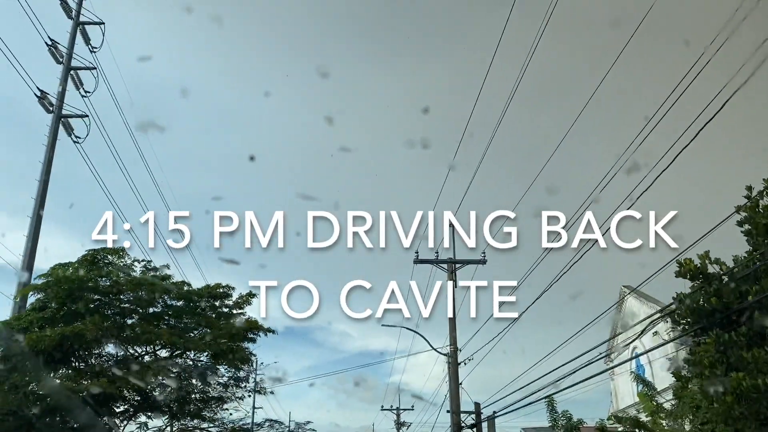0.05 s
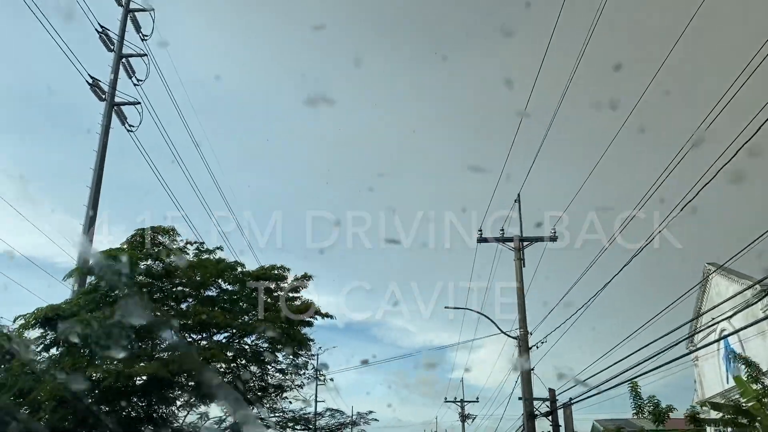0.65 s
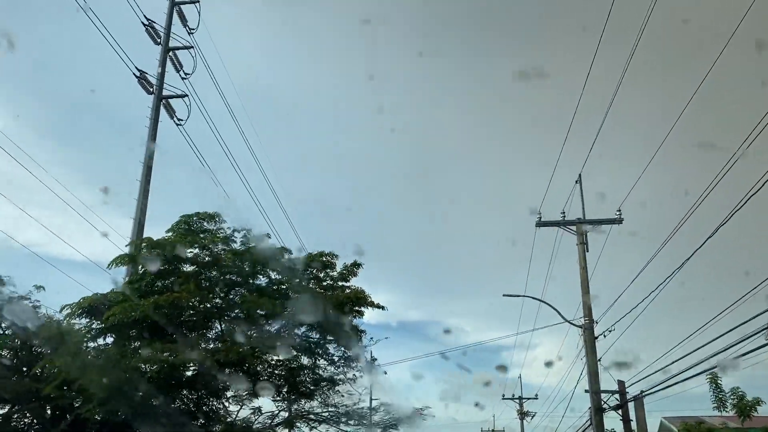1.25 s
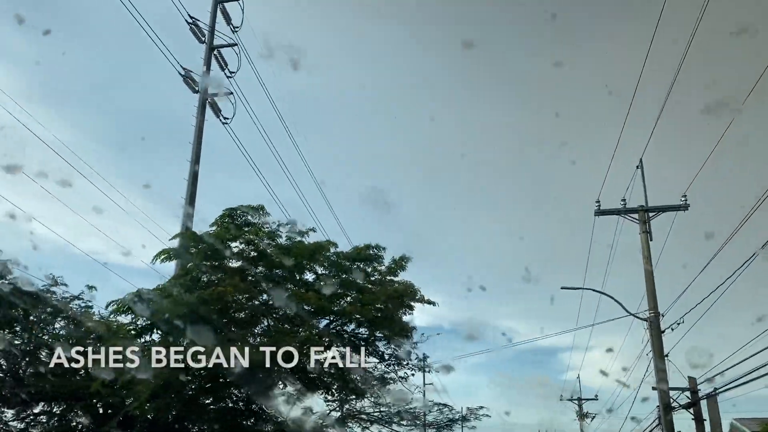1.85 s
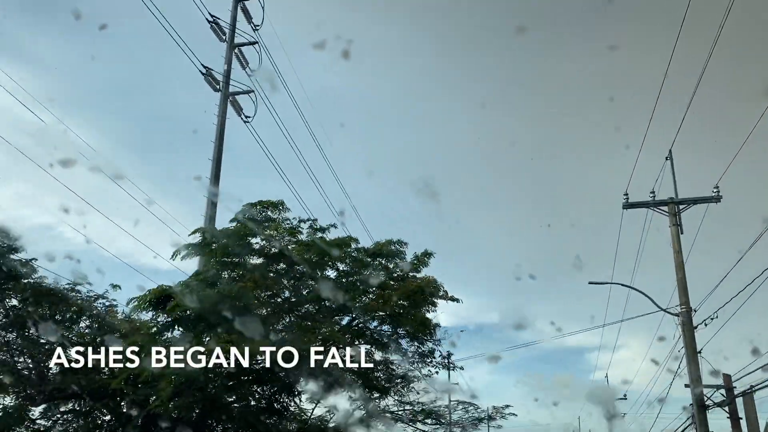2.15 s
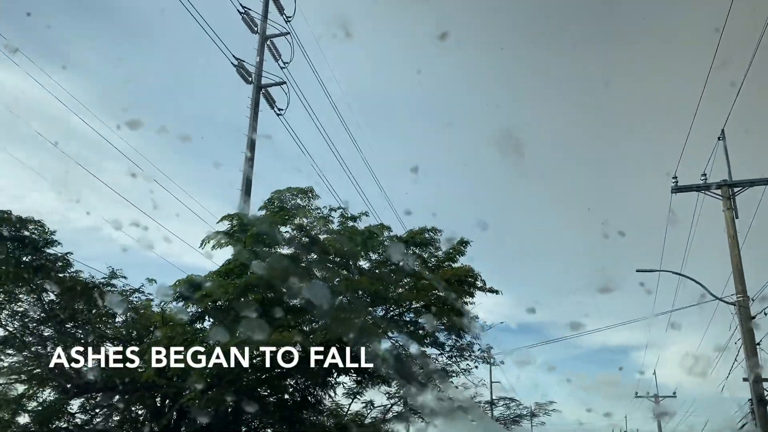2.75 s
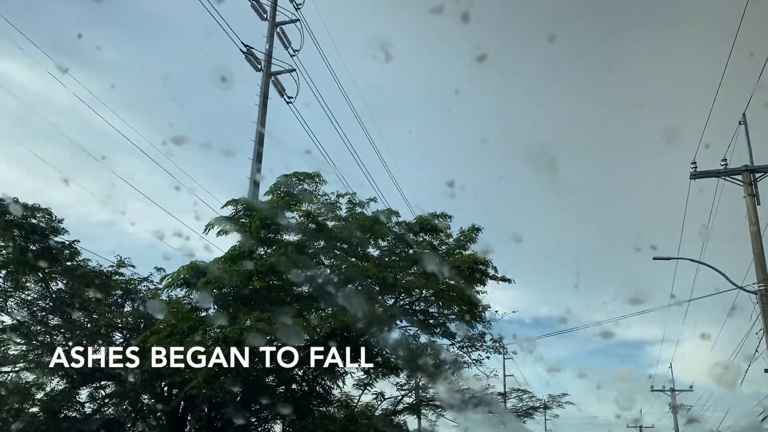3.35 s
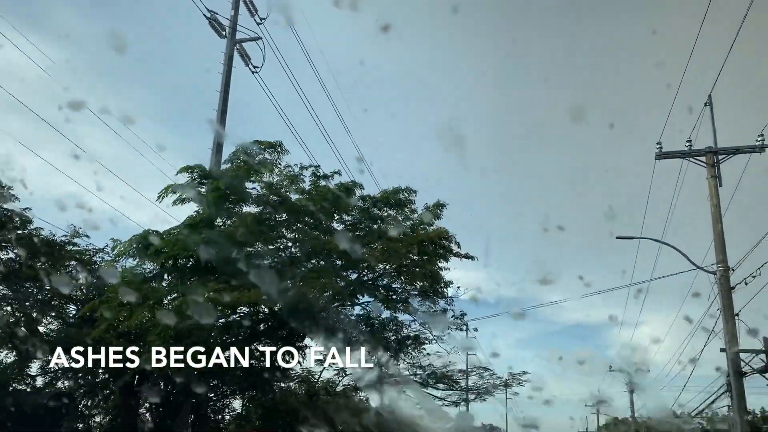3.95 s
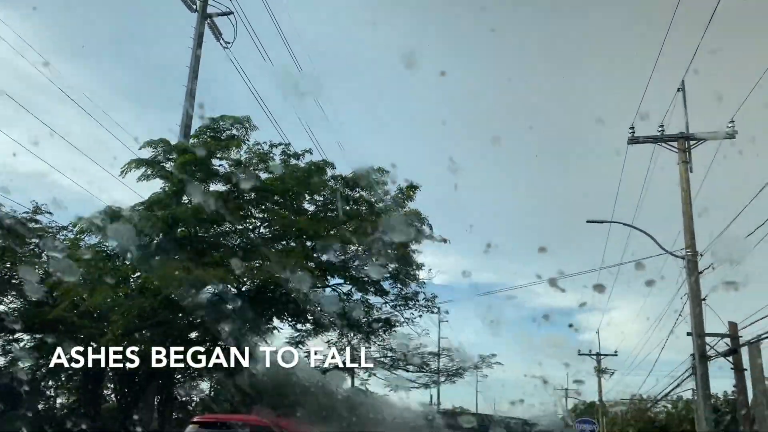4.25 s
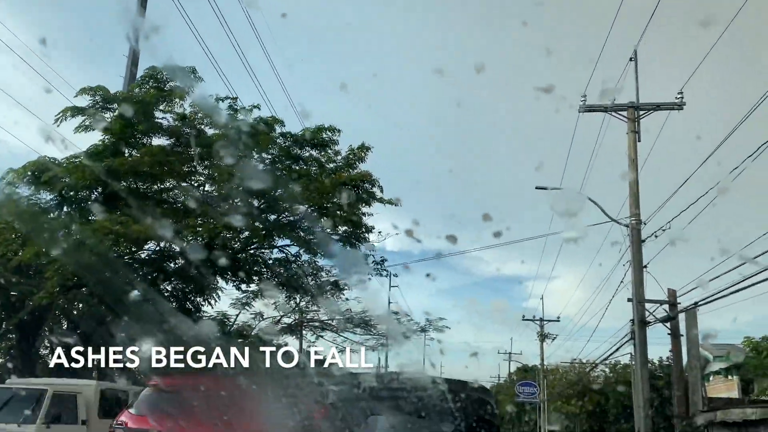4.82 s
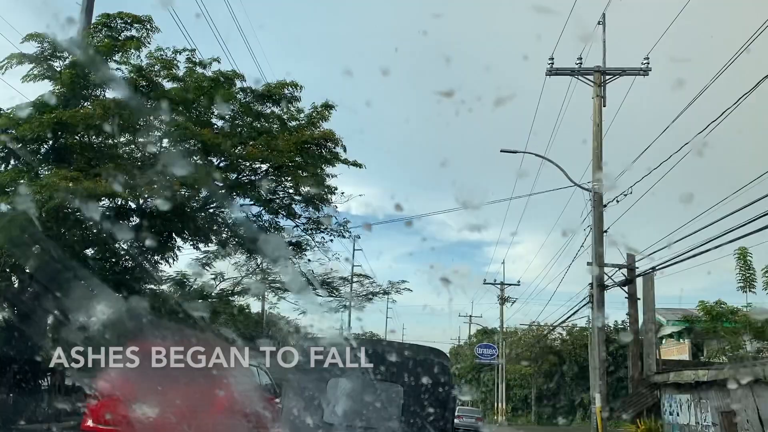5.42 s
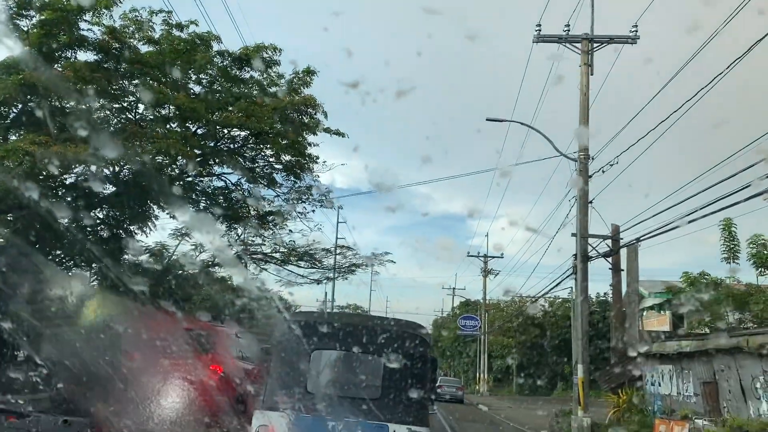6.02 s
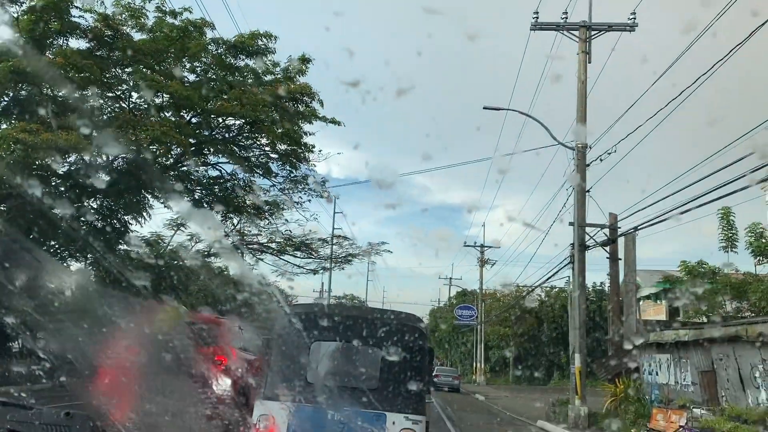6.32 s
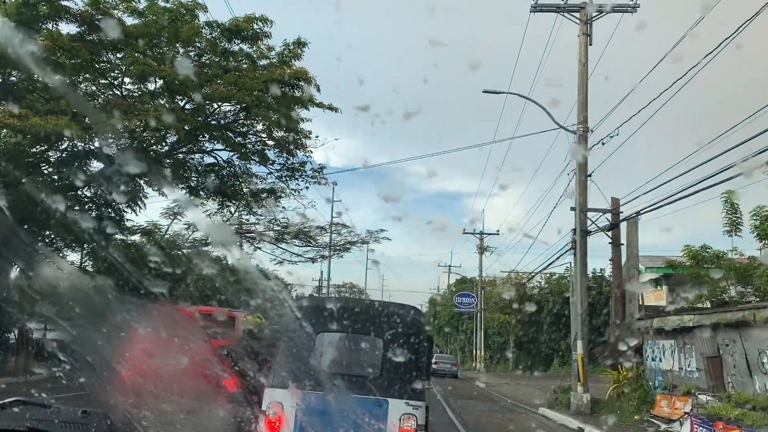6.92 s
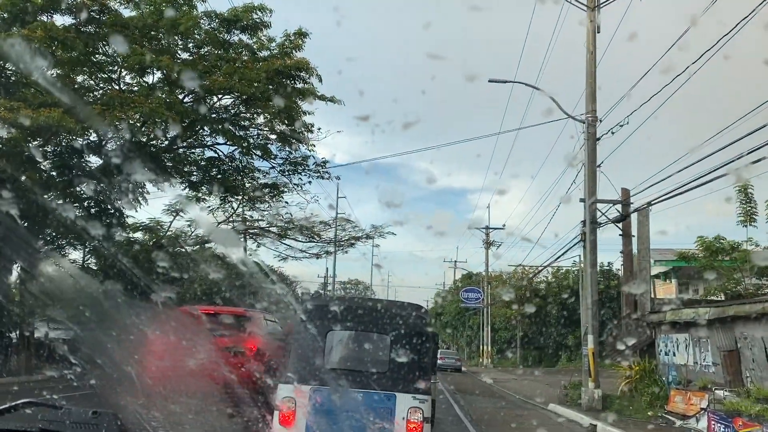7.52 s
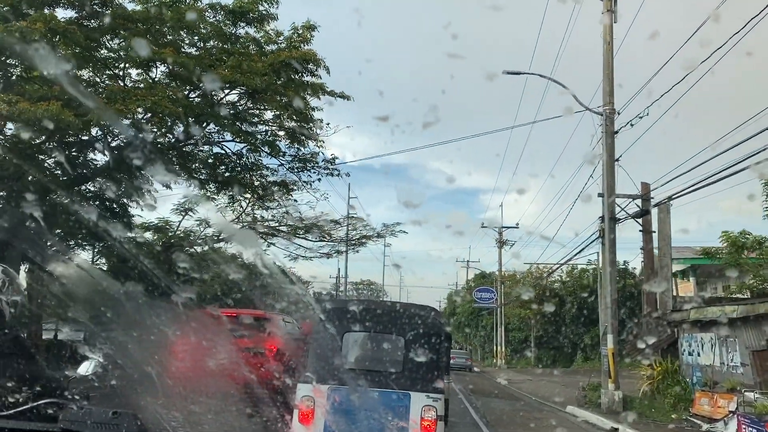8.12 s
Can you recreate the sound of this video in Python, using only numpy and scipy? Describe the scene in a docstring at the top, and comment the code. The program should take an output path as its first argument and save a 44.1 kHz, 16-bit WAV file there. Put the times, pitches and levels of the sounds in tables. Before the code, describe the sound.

Inside a small car creeping through traffic, the engine chugs at idle over a low tyre rumble and a soft swish of wet road. Close by, raindrops crack and splash irregularly on the windscreen and pat dully on the roof. About halfway, the engine speeds up and booms in the cabin, with light knocking in the panels. A faint hum wavers, and another muffled engine nearby revs and slows.

```python
"""A chugging engine and rumbling tyres, heard inside a small car creeping through traffic in light rain.
Halfway the engine picks up speed and booms in the cabin; its knocks ring the body and panels.
The tyres swish on the wet road, a faint hum wavers, and another engine idles, revs and slows nearby.
Close up, drops crack and splash on the windscreen and pat dully on the roof."""
import sys
import numpy as np
from scipy import signal
from scipy.fft import rfft, irfft
from scipy.io import wavfile
from scipy.ndimage import uniform_filter1d

SR = 44100
rng = np.random.default_rng(int(sys.argv[2]) if len(sys.argv) > 2 else 0)


def waveform_to_disk(signal):
    """Save audio, clipped to [-1, 1], as 16-bit WAV at the path in sys.argv[1]."""
    frames = np.transpose(np.atleast_2d(signal))
    scaled = np.clip(frames, -1, 1) * 32767
    samples = np.round(scaled).astype(np.int16)
    wavfile.write(sys.argv[1], SR, samples)


N = 360297

# Water on the road. Each row: middle of a puddle in seconds, wetness in dB, half length in seconds.
PUDDLES = [(0.718, -49, 0.22), (1.358, -50, 0.21), (2.504, -51.5, 0.28), (5.517, -58.5, 0.17),
           (7.848, -66, 0.6)]
DAMP_ROAD_DB = -57.5  # wetness between the puddles


def undb(db):
    """Decibels to gain."""
    return 10 ** (np.asarray(db) / 20)


def unit(x):
    """Scale to an rms of 1."""
    return x / np.sqrt(np.mean(x ** 2))


def curves(table):
    """Rows of (seconds, values...) as one automation curve per value, sample by sample."""
    s, *columns = np.transpose(table)
    return [np.interp(np.arange(N) / SR, s, c) for c in columns]


def bins():
    """Frequencies in Hz of the spectrum of a whole signal."""
    return np.arange(N // 2 + 1) * SR / N


def across(points):
    """Rows of (Hz, value) joined on a log-frequency axis."""
    hz, value = np.transpose(points)
    return np.interp(np.log(bins() + 1), np.log(hz), value)


def colour(x, points):
    """Minimum-phase EQ through rows of (Hz, dB); white noise keeps its level."""
    cepstrum = irfft(np.log(unit(undb(across(points)))), N)
    cepstrum[1:N // 2] *= 2
    cepstrum[N // 2:] = 0
    return irfft(rfft(x) * np.exp(rfft(cepstrum)), N)


def walk(rate):
    """Smooth random drift at rms 1, with `rate` new values a second."""
    hold = int(SR / rate)
    steps = np.repeat(rng.standard_normal(N // hold + 1), hold)
    return unit(uniform_filter1d(uniform_filter1d(steps, hold), hold)[:N])


def noise():
    """Two white noises: the part both microphone ports share, and the part in which they differ."""
    return rng.standard_normal((2, N))


def partial(turns, multiple):
    """A sine pair at a multiple of a rotation, at rms 1 and with random phases."""
    return np.sqrt(2) * np.sin(2 * np.pi * (multiple * turns + rng.random((2, 1))))


def resonances(modes):
    """Response of (Hz, width in Hz, dB) modes; neighbouring modes swing in opposite directions."""
    f = bins() + 1
    return sum((-1) ** k * undb(db) / (1 + 1j * (f / hz - hz / f) * hz / width)
               for k, (hz, width, db) in enumerate(modes))


def swells(base_db, patches):
    """Level per sample in dB: a steady base, and a smooth swell as the tyres cross each patch."""
    t = np.arange(N) / SR
    gains = [undb(db) * np.exp(-.5 * ((t - s) / half_s) ** 2) for s, db, half_s in patches]
    return 10 * np.log10(undb(base_db) ** 2 + sum(gain ** 2 for gain in gains))


def two_bands(x, powers, crossover_hz=8000):
    """Give the parts of x below and above the crossover their own power envelopes."""
    filters = [signal.butter(5, crossover_hz, kind, fs=SR, output="sos") for kind in ("low", "high")]
    return sum(signal.sosfilt(sos, x * np.sqrt(power[:N])) for sos, power in zip(filters, powers))


def boom(turns, hz, boom_db, shaft_db=-19):
    """The cylinders fire twice a turn; higher orders swell as they sweep through cabin resonances."""
    # How the cabin air carries a higher order. Each row: pitch in Hz, level in dB.
    cabin = [(65, -38.5), (75, -85), (88, -43), (98, -51), (110, -40), (118, -40), (123, -39.5), (131, -56),
             (146, -45), (160, -49.5), (180, -55)]
    orders = [(1, boom_db + shaft_db), (2, boom_db)]
    orders += [(k, np.interp(k * hz, *np.transpose(cabin))) for k in (3, 4, 6)]
    return sum(partial(turns, k) * undb(db) for k, db in orders)


def knocks(turns, speed, stumble_turns=.0035, weak_db_per_octave=-8.5, scatter_db=0.9,
           panels_db=-3.5, panels_t60=.09, clatter_db=-11, clatter_turns=.22, bounce_s=.0113):
    """A knock on each shaft turn rings the body, clacks and trails clatter; speed is 1 at idle."""
    # The body's ring and the hard clack. Each row: pitch in Hz, width in Hz, level in dB.
    body_modes = [(268, 3.2, 2), (389.2, 6, 4), (519.7, 12, 0.5)]
    clack_modes = [(510, 40, -23), (833.6, 56, 0)]
    # EQ of the bulkhead, the small panel modes and the clatter. Each row: frequency in Hz, gain in dB.
    bulkhead_eq = [(80, 1), (160, -1.5), (900, 9), (1200, -38), (2500, -20), (8000, -35)]
    panel_eq = [(120, -15), (200, -1), (300, -0.5), (450, -6), (700, -10), (1050, -9.5), (1300, -24.5),
                (2500, -37), (8000, -61)]
    clatter_eq = [(200, -27), (450, -13), (600, 5), (720, -24), (830, 18), (940, -9.5), (1100, -7),
                  (3000, -37), (8000, -58)]
    # the uneven idle steadies as the engine speeds up
    stumble = stumble_turns / speed ** 6 * walk(20)
    turn, age = np.divmod(np.maximum(turns + stumble, 0), 1)
    # a four-stroke cycle takes two turns: every second knock weakens as the speed rises
    size = undb(weak_db_per_octave * np.log2(speed) * (turn % 2) + scatter_db * walk(30))
    hits = rfft(np.diff(turn, prepend=0) * size)
    # each clack lands, then bounces twice
    bounces = sum(undb(db) * np.exp(-2j * np.pi * bins() * k * bounce_s)
                  for k, db in enumerate((0, 0, -8)))
    body = resonances(body_modes) + resonances(clack_modes) * bounces
    ringing = unit(irfft(hits * body * undb(across(bulkhead_eq)), N)) * np.array([[1], [.5]])
    # the panels answer every knock alike, so they sing a comb of overtones
    panel_ring = noise() * undb(-60 * np.arange(N) / SR / panels_t60)
    panels = unit(irfft(hits * rfft(panel_ring) * undb(across(panel_eq)), N))
    swell = age * np.exp(-2 * age / clatter_turns)
    clatter = unit(irfft(rfft(noise() * size * swell) * undb(across(clatter_eq)) * bounces, N))
    return ringing + undb(panels_db) * panels + undb(clatter_db) * clatter


def engine(wander=0.000611, idle_knock_db=-51.5, rise_db_per_octave=6.5, boom_follow=0.047):
    """The car's own engine: one shaft drives boom and knocks, both louder as the car pulls away."""
    # Engine speed. Each row: time in seconds, shaft rate in Hz.
    revs = [(0, 21.64), (3.7, 21.64), (4.15, 24.75), (4.55, 25.7), (5.0, 28.05), (5.75, 30.5), (6.0, 30.5),
            (6.5, 30), (8.17, 29.95)]
    # The firing boom. Each row: time in seconds, level in dB.
    boom_levels = [(0, -57), (3.6, -50), (4.15, -39), (4.55, -32), (5.0, -23.5), (5.75, -30), (6.05, -37.5),
                   (6.5, -29), (8.17, -29)]
    hz, = curves(revs)
    boom_db, = curves(boom_levels)
    speed = hz / hz[0]
    knock_db = idle_knock_db + rise_db_per_octave * np.log2(speed) + boom_follow * (boom_db - boom_db[0])
    turns = np.cumsum(hz * (1 + wander * walk(5.97))) / SR
    return boom(turns, hz, boom_db) + undb(knock_db) * knocks(turns, speed)


def hum(hz=197.7, level_db=-53, waver_db=3):
    """A faint tone that wavers in level, sinks away around 3 s and comes back."""
    # The hum's fader. Each row: time in seconds, gain in dB.
    fade = [(0, 0), (2.3, -5.5), (3, -23), (5, -2)]
    fade_db, = curves(fade)
    return partial(np.arange(N) / SR, hz) * undb(level_db + fade_db + waver_db * walk(4.66))


def neighbour(rough_db=0.5):
    """Only the low orders of an engine outside pass the windows; at idle it beats with the car's own."""
    # Idling, revving, slowing. Each row: time in seconds, cycle rate in Hz, level in dB.
    revs = [(0, 20.5, -42), (3.9, 20.5, -39.5), (5.0, 26.3, -40), (5.9, 29.2, -34), (6.15, 30.8, -36.5),
            (6.6, 28.59, -35.5), (7.0, 26.4, -27.5), (7.5, 24.6, -31), (8.17, 23.9, -32.5)]
    # What the closed windows let in. Each row: frequency in Hz, gain in dB.
    windows = [(61, -0.5), (66, 2), (72, -7.5), (80, -1.5), (102, -9), (121, -4.5), (140, -18), (160, -22),
               (200, -24)]
    hz, db = curves(revs)
    turns = np.cumsum(hz) / SR
    orders = [(k, np.interp(k * hz, *np.transpose(windows))) for k in (3, 4, 5, 6)]
    return sum(partial(turns, k) * undb(db + order_db + rough_db * walk(6.8)) for k, order_db in orders)


def tyres(smooth_road_db=-37, bump_db=1, roar_flicker_db=1, spray_db=-3, spray_flicker_db=2, grit_db=3):
    """Bumps shake the cabin, the tread roars, and water is thrown off in uneven, gritty spurts."""
    # Tone of the three tyre layers. Each row: frequency in Hz, gain in dB.
    rumble_eq = [(15, -40), (28, -22), (40, -4), (52, -6.5), (63, 3.5), (72, -5.5), (85, -4), (100, -7.5),
                 (125, -12), (150, -16.5), (220, -40.5), (400, -69.5)]
    roar_eq = [(80, -25.5), (150, -4), (200, -0.5), (228, -4), (265, 0), (330, -6.5), (430, -10), (520, -6),
               (600, -10), (720, -12.5), (850, -11), (1000, -17.5), (1500, -34.5), (3000, -45.5),
               (8000, -44)]
    swish_eq = [(300, -11), (700, -2), (1300, 9), (2200, -6), (4000, -4.5), (7000, -12.5), (11000, -24),
                (16000, -34)]
    # Rough patches of road. Each row: middle in seconds, rumble in dB, half length in seconds.
    bumps = [(0.256, -32.5, 0.33), (1.91, -32.5, 0.17), (2.4, -34.5, 0.15), (4.81, -31.5, 0.84),
             (7.093, -36, 0.42)]
    # Roar of the tread. Each row: time in seconds, level in dB.
    tread = [(0, -48), (1.4, -45), (4, -44.5), (5.5, -45), (8.17, -45)]
    rumble = colour(noise(), rumble_eq) * undb(swells(smooth_road_db, bumps) + bump_db * walk(13))
    roar_db, = curves(tread)
    roar = colour(noise(), roar_eq) * undb(roar_db + roar_flicker_db * walk(25))
    grit = unit(noise() * undb(grit_db * walk(700)))
    swish_db = swells(DAMP_ROAD_DB, PUDDLES) + spray_db + spray_flicker_db * walk(40)
    return rumble + roar + colour(grit, swish_eq) * undb(swish_db)


def roof(count=620, patter_db=-2, spread_db=4, low_hz=1000, high_hz=2600, q=1.26,
         rise_s=0.00047, t60=0.087):
    """Drops come through the roof lining as dull, pitched pats, louder where the road is wet."""
    # The pats that stand out. Each row: start in seconds, level in dB, pitch in Hz.
    accents = [(.349, -41.5, 1180), (.589, -39.5, 1510), (.899, -40, 1100), (1.187, -40, 1240),
               (1.26, -46, 1150), (1.533, -34.5, 1290), (1.709, -36.5, 990), (1.77, -54, 1490),
               (2.093, -46.5, 2500), (2.176, -47, 1290), (2.266, -41, 1400), (2.384, -41.5, 1200),
               (3.479, -47, 1360), (3.821, -47, 1300), (3.845, -39, 1120), (4.398, -44, 1260),
               (5.14, -44, 1220), (5.955, -52, 1150), (7.722, -38, 760)]
    when, size, pitch = rng.random((count, 3)).T
    wet_db = swells(DAMP_ROAD_DB, PUDDLES)[(when * N).astype(int)]
    pat_db = wet_db + patter_db + spread_db * (2 * size - 1)
    patter = np.column_stack([when * N / SR, pat_db, low_hz * (high_hz / low_hz) ** pitch])
    t = np.arange(SR // 10) / SR
    envelope = (1 - np.exp(-t / rise_s)) * undb(-60 * t / t60)
    out = np.zeros((2, N + len(t)))
    for s, db, hz in np.vstack([accents, patter]):
        b, a = signal.iirpeak(hz, q, fs=SR)
        ring = signal.lfilter(b, a, signal.lfilter(b, a, rng.standard_normal((2, len(t)))))
        start = int(s * SR)
        out[:, start:start + len(t)] += undb(db) * unit(ring) * envelope / envelope.max()
    return out[:, :N]


def drizzle(count=330, base_db=-56, ease_db_per_s=1.28, spread_db=6.5, largest_db=8, t60=0.075,
            treble_db=1, treble_spread_db=3):
    """Rows of small drops for the windscreen: an uneven patter that slowly gets quieter."""
    when, size, length, tone = rng.random((count, 4)).T
    s = (np.arange(count) + 2 * when) % count / count * N / SR
    db = base_db - ease_db_per_s * s + np.minimum(-spread_db * np.log(1 - size), largest_db)
    treble = treble_db + treble_spread_db * (2 * tone - 1)
    return np.column_stack([s, db, t60 * 2 ** (2 * length - 1), treble])


def windscreen(crack_db=3, crack_s=.0008, spread_s=0.0043, soft_t60=0.12, grain_db=4,
               glass_db=-0.5, glass_db_per_doubling=12.5, knock_t60=0.22):
    """Each drop cracks on the glass, which knocks briefly, then scatters as a fizz of tiny beads."""
    # The biggest drops. Each row: start in seconds, level in dB, splash t60 in seconds, treble in dB.
    big_drops = [(.1025, -42.5, 0.081, 0), (.195, -48, 0.087, 2), (.2411, -34.5, 0.057, 3),
                 (.266, -43, 0.044, 2), (.416, -47, 0.12, 7), (.5075, -38, 0.085, 4.5),
                 (.591, -52, 0.037, -8), (.6236, -37.5, 0.081, 5), (.707, -55, 0.19, 11),
                 (.8505, -43.5, 0.08, 1.5), (.998, -40.5, 0.033, -8), (1.0568, -32, 0.043, 0),
                 (1.1044, -30, 0.023, -5), (1.1228, -40.5, 0.039, 5), (1.3194, -42.5, 0.11, 5),
                 (1.3568, -40.5, .03, -5), (1.4145, -42.5, 0.022, 6), (1.443, -55, .03, 0),
                 (1.53, -34.5, 0.075, -1.5), (1.6046, -27.5, 0.03, -1), (1.7067, -33, 0.034, -4.5),
                 (1.7614, -44, 0.12, -6), (1.812, -46, 0.022, 0), (1.929, -45, 0.018, -6),
                 (1.9873, -43, 0.023, 7), (2.2583, -34, 0.084, 2), (2.4264, -49, 0.081, 7),
                 (2.671, -43.5, 0.033, -3), (2.7205, -40.5, 0.078, 6), (2.775, -48, 0.034, 2),
                 (3.1101, -44, 0.036, 5), (3.2839, -47.5, 0.098, 3), (3.301, -44, 0.044, -8),
                 (3.5511, -33, 0.054, 5), (3.5871, -44, 0.076, 3), (3.6441, -44.5, 0.046, 5),
                 (3.7054, -42.5, 0.07, 4), (3.7698, -43, 0.082, -2), (3.833, -31, 0.072, 2),
                 (3.8414, -27.5, 0.074, 3.5), (3.936, -52, 0.11, 5), (4.059, -43, 0.044, 2.5),
                 (4.096, -48.5, 0.1, 4.5), (4.127, -48, .04, 3), (4.255, -47.5, 0.023, 1),
                 (4.323, -46.5, 0.069, -4), (4.5458, -44, 0.083, 3), (4.822, -47, 0.13, -5),
                 (4.9, -49.5, 0.13, 1), (5.1266, -52.5, 0.13, 7), (5.1664, -46, 0.08, 3),
                 (5.4041, -38.5, 0.085, 4.5), (5.5189, -38.5, 0.023, -13), (5.58, -45, 0.019, -3),
                 (5.649, -50, 0.092, -14), (5.6825, -44, 0.05, -14), (5.7161, -44, 0.034, 2),
                 (5.8138, -43, 0.092, 3.5), (5.88, -52, .16, 8), (5.9528, -39.5, 0.12, -9),
                 (5.995, -48, 0.085, 4), (6.156, -51, 0.018, 10.5), (6.2551, -46.5, 0.019, 6),
                 (6.4956, -44, 0.033, -7), (6.5464, -47.5, 0.13, 3), (6.742, -49, 0.049, -2),
                 (6.958, -43, 0.085, 5), (7.0108, -46, 0.02, 9), (7.0463, -45.5, 0.029, 6),
                 (7.168, -55, 0.095, 3), (7.319, -52, 0.018, -18), (7.374, -57, 0.025, 4),
                 (7.5398, -45, 0.063, 0), (7.6695, -46.5, 0.085, -4), (7.7, -47, 0.076, -1),
                 (7.754, -46, 0.064, 1), (7.7764, -44.5, 0.036, 1), (7.818, -54, 0.051, 3),
                 (7.965, -50.5, 0.11, -12), (8.0678, -42.5, 0.06, 1)]
    # Tone of the first crack, the splash and the glass. Each row: frequency in Hz, gain in dB.
    crack_eq = [(500, -19), (2000, -10), (4500, -3), (7000, -11.5), (10000, -2.5), (14000, 2.5),
                (16000, -10.5)]
    splash_eq = [(500, -22), (1500, -8.5), (2500, -1.5), (3300, -0.5), (4800, 2), (7000, -2.5), (10000, -1),
                 (13000, -7.5), (16000, -16)]
    glass_eq = [(150, -11), (400, -2), (800, -1.5), (1300, -3.5), (2000, -12.5), (3500, -15), (8000, -45)]
    t = np.arange(SR // 5) / SR
    # overlapping drops add in power; crack and splash each have a low and a treble band
    crack_power, splash_power = np.zeros((2, 2, N + len(t)))
    knock_power = np.zeros(N + len(t))
    for s, db, t60, treble_db in np.vstack([big_drops, drizzle()]):
        at = slice(int(s * SR), int(s * SR) + len(t))
        # a drop that splashes for long lands softly: less crack, slower swell, more knock
        softness = (t60 / soft_t60) ** 2
        swell = 1 - np.exp(-t / (spread_s * softness))
        knock_db = db + glass_db + glass_db_per_doubling * np.log2(t60 / 0.1)
        band_db = db + np.array([[0], [treble_db]])
        crack_power[:, at] += (undb(band_db + crack_db) * np.exp(-t / crack_s) / (1 + softness)) ** 2
        splash_power[:, at] += (swell * undb(band_db - 60 * t / t60)) ** 2
        knock_power[at] += undb(knock_db - 60 * t / knock_t60) ** 2
    beads = unit(noise() * undb(grain_db * walk(2500)))
    crack = colour(two_bands(noise(), crack_power), crack_eq)
    splash = colour(two_bands(beads, splash_power), splash_eq)
    knock = colour(noise() * np.sqrt(knock_power[:N]), glass_eq)
    return crack + splash + knock


def pings(hz=4550, t60=.016):
    """Two hard drops leave a short, bright ring."""
    # The hard hits. Each row: start in seconds, level in dB.
    hits = [(1.105, -38), (1.604, -33.5)]
    s, db = np.transpose(hits)
    t = np.maximum(np.arange(N) / SR - s[:, None], 0)
    rings = np.sqrt(2) * np.sin(2 * np.pi * hz * t) * undb(-60 * t / t60)
    return undb(db) @ rings * np.array([[1], [.5]])


def microphone_ports(pair):
    """Bass reaches both ports alike, the middle is diffuse, and the top reaches the left port late."""
    # How alike the ports sound. Each row: frequency in Hz, correlation from 0 to 1.
    correlation = [(60, 1), (130, .95), (290, .68), (640, .52), (1400, .17), (3100, .5), (6800, .5),
                   (8400, .75), (10000, .95), (15000, .97)]
    # Phase between the ports. Each row: frequency in Hz, lead of the left in radians.
    left_lead = [(0, 0), (700, 0), (1050, .5), (1550, -1.2), (2500, .6), (5800, .6), (6630, .1),
                 (8350, -3.14), (15800, -15.7)]
    # Stereo balance. Each row: frequency in Hz, left minus right in dB.
    balance = [(60, -1.7), (125, -1.7), (250, -0.5), (1000, -1.5), (2000, 0.5), (4500, 3), (8000, 0)]
    shared, apart = rfft(pair)
    likeness = across(correlation)
    shared *= np.sqrt((1 + likeness) / 2)
    apart *= np.sqrt((1 - likeness) / 2)
    lead = np.exp(1j * np.interp(bins(), *np.transpose(left_lead)))
    tilt = undb(across(balance) / 2)
    return irfft(np.array([(shared + apart) * tilt * lead, (shared - apart) / tilt]), N)


def scene():
    """Engines, tyres and rain as they reach the microphone behind the windscreen."""
    return microphone_ports(engine() + hum() + neighbour() + tyres() + roof() + windscreen() + pings())


def record(dry):
    """A steep low-pass takes off the air above 16.1 kHz."""
    return signal.sosfilt(signal.ellip(8, .2, 70, 16100, fs=SR, output="sos"), dry)


dry = scene()
out = record(dry)
waveform_to_disk(out)
```